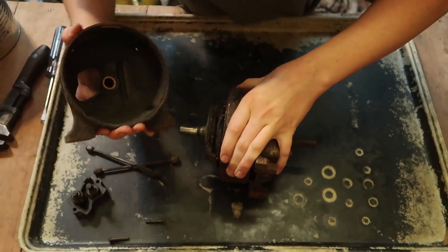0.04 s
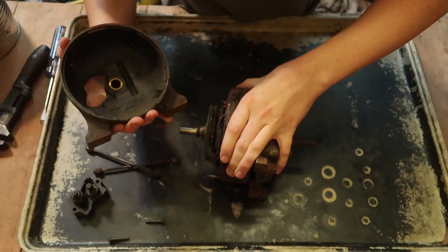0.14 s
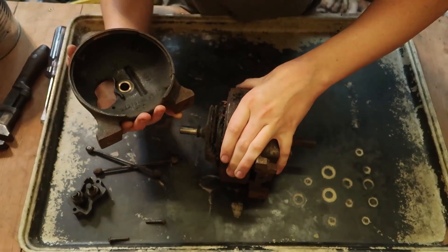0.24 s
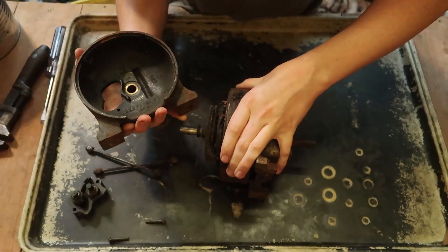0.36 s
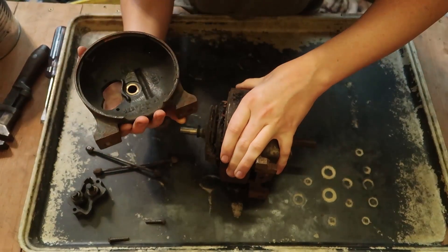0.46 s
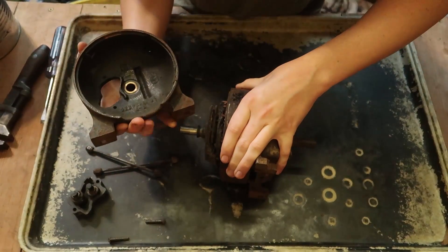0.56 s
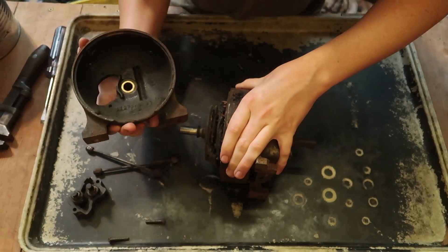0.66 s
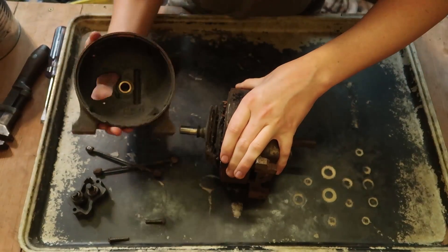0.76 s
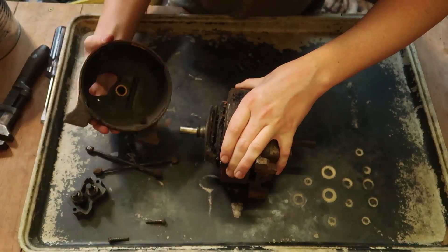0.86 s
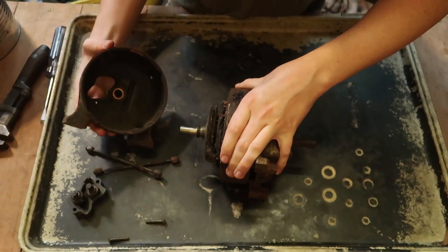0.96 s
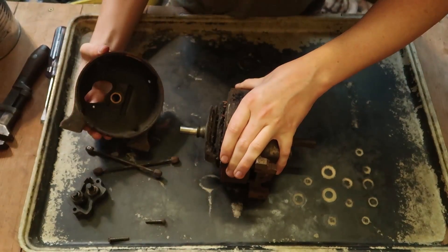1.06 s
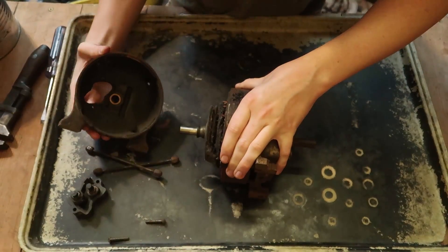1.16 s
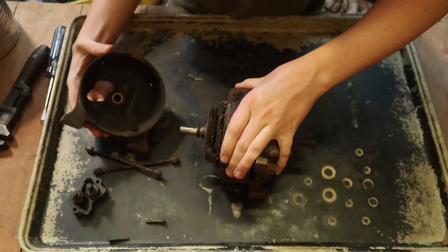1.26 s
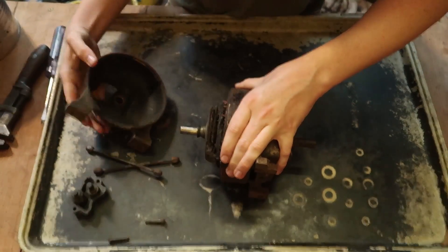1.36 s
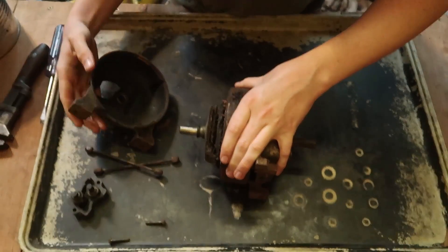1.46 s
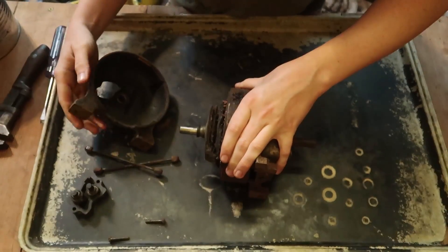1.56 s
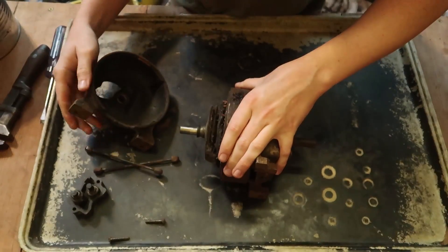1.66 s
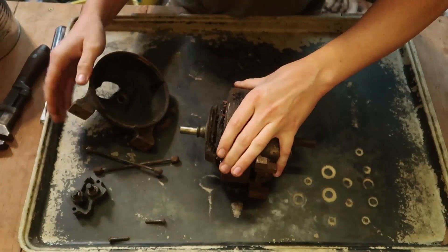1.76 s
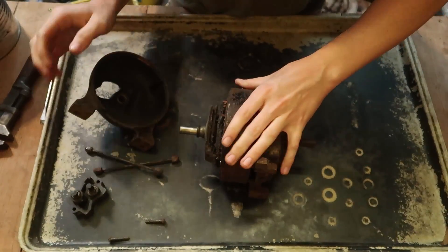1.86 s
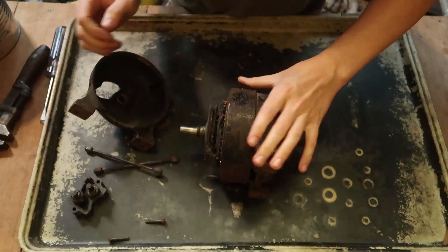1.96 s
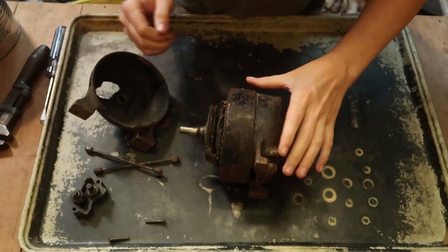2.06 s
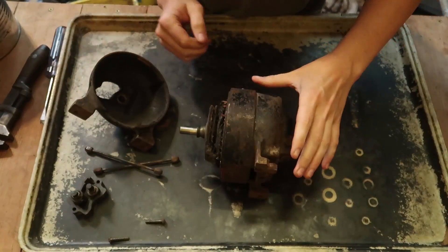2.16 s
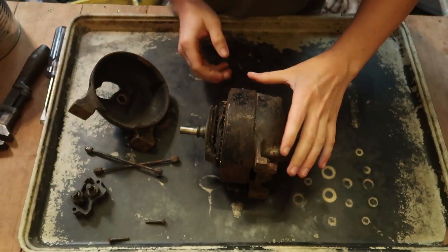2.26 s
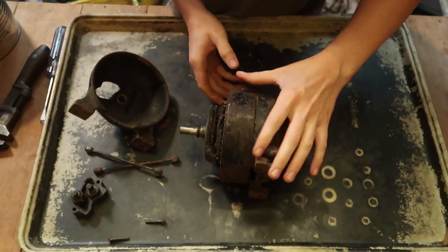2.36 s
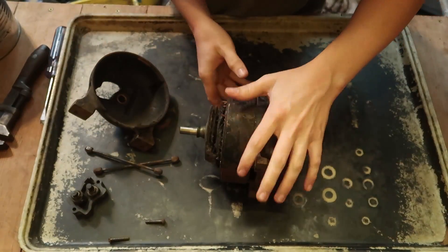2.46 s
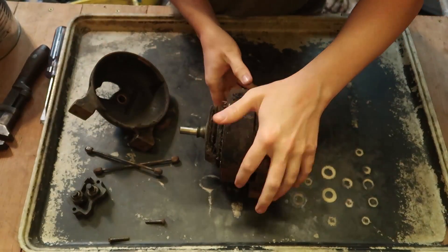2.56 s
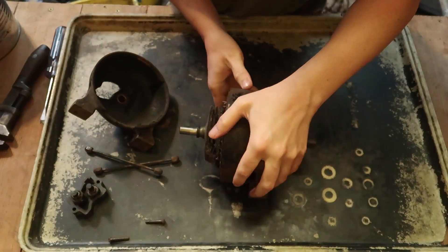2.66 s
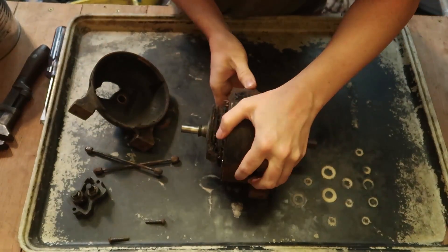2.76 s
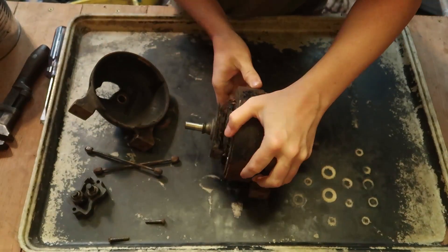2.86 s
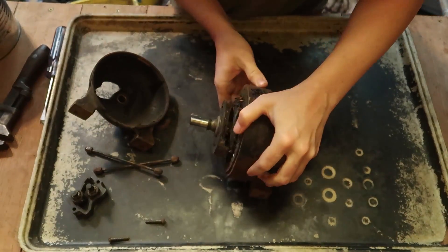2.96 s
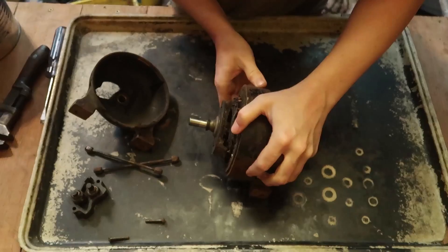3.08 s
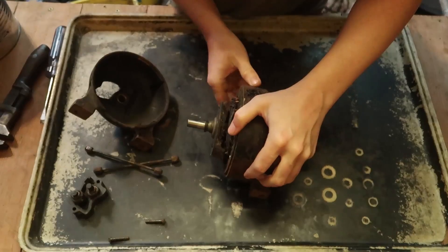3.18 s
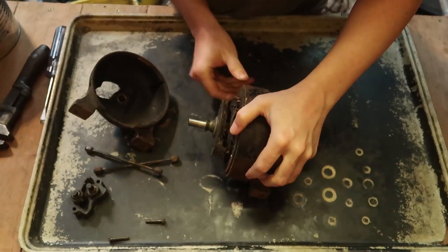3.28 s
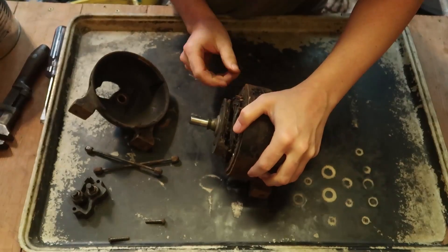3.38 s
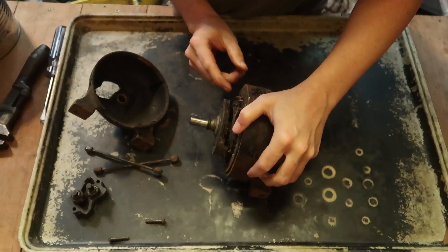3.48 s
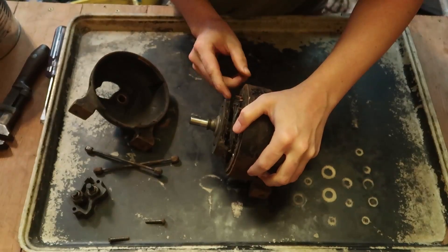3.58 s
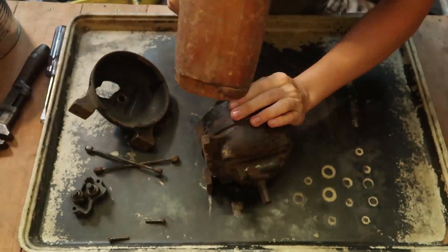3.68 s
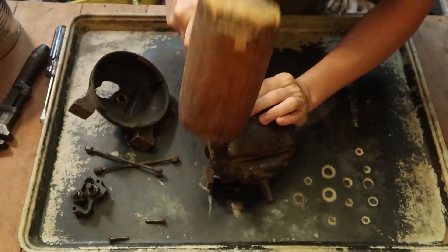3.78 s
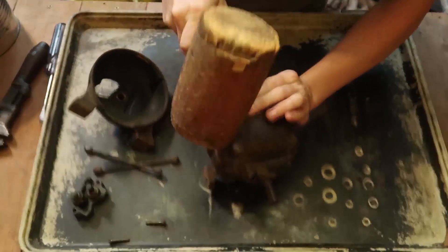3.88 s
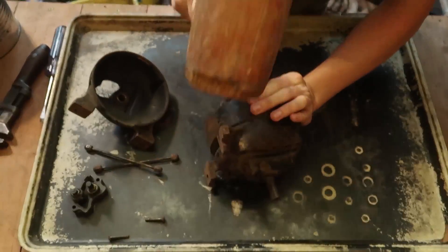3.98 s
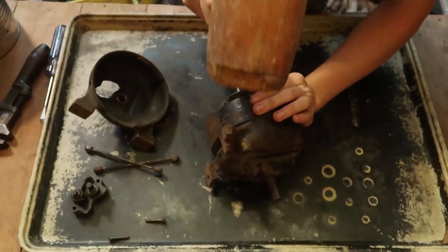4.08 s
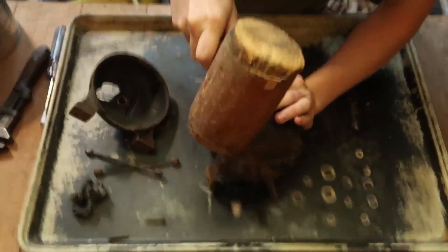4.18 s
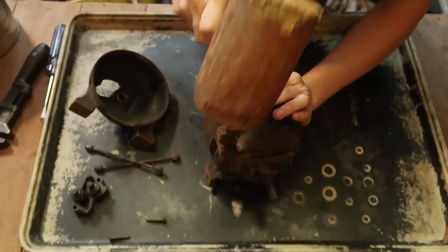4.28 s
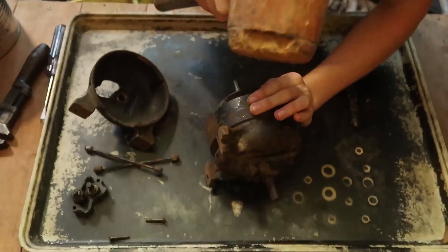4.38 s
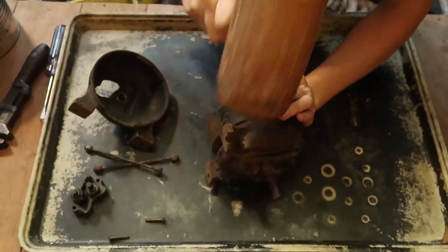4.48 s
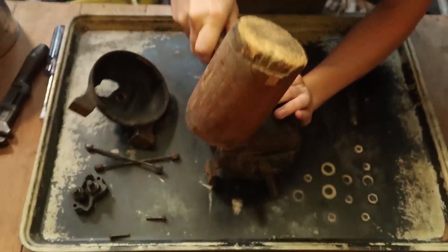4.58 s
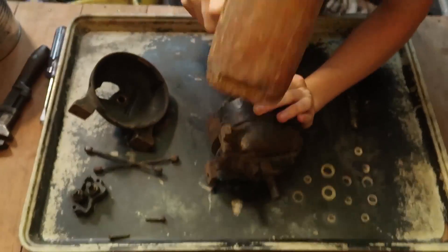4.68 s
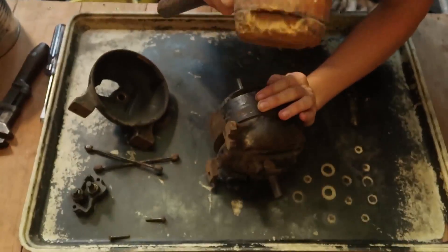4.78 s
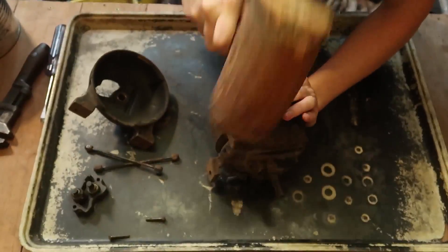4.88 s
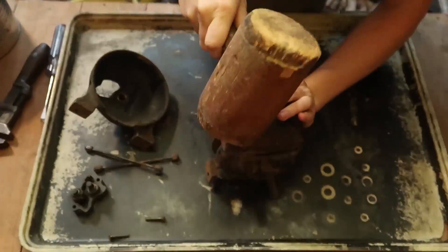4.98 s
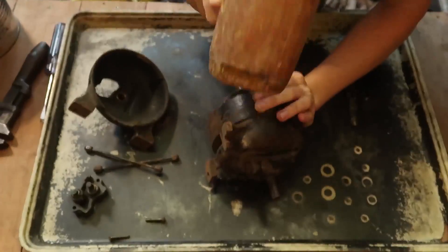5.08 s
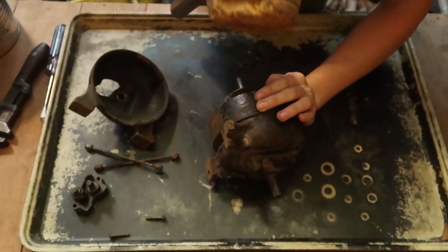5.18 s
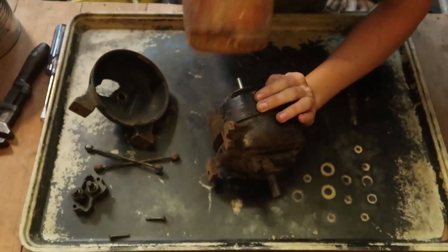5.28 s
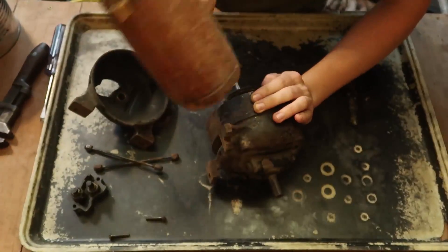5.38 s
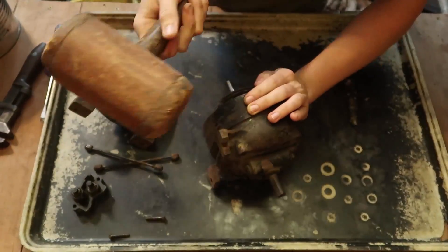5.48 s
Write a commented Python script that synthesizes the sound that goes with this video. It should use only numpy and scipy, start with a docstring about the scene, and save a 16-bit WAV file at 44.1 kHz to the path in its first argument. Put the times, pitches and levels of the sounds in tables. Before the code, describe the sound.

A metal cover clanks onto a steel tray, then a wooden mallet strikes a motor four times, rattling it against the tray.

```python
"""Workshop bench with a steel tray. A cast end cover is set down, slid and dropped. A motor is turned
over, struck four times with a wooden mallet, and rocks on the tray after each blow. Each contact
rings the casting's modes, rattles the tray and thuds the bench; grit rasps under sliding metal.
Around it: hiss, mains buzz, rumble, faint far whistles. The close mic overloads on the hardest knocks."""
import sys
import numpy as np
from scipy import signal
from scipy.fft import rfft, irfft
from scipy.io import wavfile
from scipy.ndimage import uniform_filter1d

SR = 44100
rng = np.random.default_rng(int(sys.argv[2]) if len(sys.argv) > 2 else 0)


def persist_wave(psi):
    """Save psi, clipped to +-1, as 16-bit WAV."""
    counts = np.round(np.clip(psi, -1, 1) * 32767).astype(np.int16)
    wavfile.write(sys.argv[1], SR, np.atleast_2d(counts).T)


N = 244314
RING_S = np.arange(SR // 2) / SR  # time since contact

# Workshop noise spectra: f/Hz, relative density/dB
HISS_SPECTRUM = [(94, -26), (160, -4.5), (260, -13), (340, -5.5), (430, -12.5), (700, -14.5), (1120, -18.5),
                 (2220, -21), (4500, -26.5), (6300, -31.5), (9000, -36.5), (12000, -40), (14500, -58.5),
                 (16000, -67)]
RUMBLE_SPECTRUM = [(10, -34.5), (30, -15.5), (55, 1.5), (85, 4.5), (114, 6.5), (135, -18.5), (170, -18.5),
                   (300, -22), (600, -70.5)]
# Hiss, left to right: f/Hz, correlation/1
HISS_COHERENCE = [(150, 0.75), (250, 1), (400, 0.15), (700, 0.097), (1500, 0.11), (5000, .02)]
# Mains buzz: f/Hz, level/dB re hiss
BUZZ_TONES = [(360, -21), (480, -9), (720, -24), (960, -23.5), (1200, -19), (1253, -27.5), (1560, -30)]
# Background gain, lower after the hard knocks: t/s, level/dB
SHOP_GAIN = [(0, -3.5), (.85, 0.64), (1.48, 1.8), (1.62, -9.5), (2.3, -9.5), (3.3, 0.5), (3.95, 0.3),
             (4.3, -4.5), (4.8, -7.5), (5.54, -10.5)]

# Modes of motor, cover, bench, mallet head: f/Hz, level/dB, t60/s
MOTOR_MODES = [(191, -9.5, 0.09), (315.6, -10, 0.4), (426.5, 5.5, 0.05), (485, -26.5, 0.11),
               (600, -8, 0.005), (672, -11, 0.048), (751, 3, 0.03), (1094, 1.5, 0.027),
               (1350, -20.5, 0.048), (1640, 3, 0.031), (1850, -24, 0.14), (2520, 1, 0.065),
               (3200, -11.5, .03), (5130, -18.5, 0.056)]
COVER_MODES = [(460, -5, .05), (603, -9, 0.18), (822, -11.5, 0.13), (1138, -13.5, 0.15), (1212, -4, 0.075),
               (1303, 5, .05), (1575, -5.5, 0.065), (1860, -2.5, .06), (2000, -7, .05), (2370, -9, 0.045),
               (2830, -5.5, 0.033), (3040, -3.5, .04)]
BENCH_MODES = [(65, -4.5, .2), (76.8, 6.5, 0.13), (95.5, 4, 0.14), (125, -2, 0.1)]
MALLET_MODES = [(2130, -8.5, .04), (2356, 2.4, 0.054), (2550, -7.5, 0.033), (2950, -12, 0.043),
                (3600, -12.5, .03)]
# Tray's free rim: f/Hz, level/dB, t60/s
RIM_DECAY = [(150, -6, 0.98), (500, -7.5, 0.12), (1500, -18, 0.4), (4000, -18.5, .4), (7000, -14, 0.12),
             (10000, -15, .2)]
# Spectra of tray rattle, contact crack, grit: f/Hz, level/dB
TRAY_SPECTRUM = [(90, -25), (150, -2.5), (320, -4), (600, -11.5), (1000, -11.5), (1600, -13), (2600, -13.5),
                 (4000, -24), (6000, -35), (8000, -42), (14000, -59.5)]
CRACK_SPECTRUM = [(400, -13), (900, -3), (1500, 2.5), (2400, 1), (3200, -5.5), (4800, -4.5), (7000, -20),
                  (9000, -22.5), (12000, -36), (17000, -60.5)]
GRIT_SPECTRUM = [(180, -32), (350, -7.5), (650, -9.5), (1150, 0.5), (1600, -6), (2050, -2), (2500, -7),
                 (3050, -4.5), (3500, -12.5), (5500, -25.5), (7000, -34.5), (14000, -63)]
# Room echo: f/Hz, t60/s
ROOM_DECAY = [(200, 0.56), (1000, 0.55), (4000, 0.12), (10000, 0.05)]

# Thud, rattle, crack and head below are gains re the row's level.
# Hand shifts and rolls the motor: t/s, level/dB, contact/ms, thud/dB, crack/dB
MOTOR_SHIFTS = [(0.161, -44.5, 0.07, -2, -2), (3.076, -37, 0.66, 9, -25), (3.087, -37, 0.34, -5, -14),
                (3.094, -24, 1.55, -8, -35), (3.111, -27.5, 1.4, -22, -35), (3.1367, -22, .36, -5, -21),
                (3.18, -31, 0.61, -5, -18), (3.194, -25.5, 2.2, 5, -35), (3.213, -41, 0.29, 9, 2),
                (3.225, -31.5, 1.9, -13, -35), (3.476, -32.5, 1.8, -1, -30), (3.519, -42.5, 1.4, 15, -33)]
# Far whistles: t/s, length/s, f/Hz, flat at onset/Hz, level before fade/dB
FAR_WHISTLES = [(.645, 0.087, 2235, 60, -66), (.81, 0.14, 2244, 30, -60.5), (2.549, 0.12, 2960, 30, -65),
                (3.737, 0.27, 2770, 430, -55.5)]
# Cover meets tray: t/s, level/dB, thud/dB, rattle/dB, crack/dB
COVER_HITS = [(1.1265, -7, -6.5, -2.5, -37), (1.1336, -6.5, 2.5, -7.5, -37.5),
              (1.312, -43.5, -10.5, -1.5, -22.5), (1.4682, -21.5, -10, -15.5, -18.5),
              (1.4707, 4, -8, 0.5, -22.5), (1.4749, 6, -8.5, -17, -14), (1.4828, -6, 2.5, -7, -19.5),
              (1.5681, -19.5, 7, 2, -35)]
# Metal dragged on the tray: t/s, length/s, first level/dB, last level/dB
TRAY_SLIDES = [(1.164, .12, -41, -53), (1.313, 0.056, -54, -52), (1.365, 0.099, -46, -43),
               (1.568, 0.097, -31.5, -68), (3.201, 0.39, -64, -66), (4.137, 0.23, -57.5, -65),
               (4.468, .15, -61, -67), (5.207, 0.19, -61, -72)]
# Mallet on motor: t/s, level/dB, rattle/dB, crack/dB, head/dB
MALLET_BLOWS = [(3.9346, 3.5, -6, -14, -23), (4.2849, 0.5, -1.5, -19, -15), (4.64, -4, 5, -34, -12),
                (5.0178, -3, -4.5, -40, -25)]
# Motor rocks back onto the tray: t/s, level/dB, rattle/dB, crack/dB
MOTOR_ROCKS = [(3.995, -9, -5.5, -8.5), (4.0235, -17.5, -20, -17), (4.0716, -19, 0.5, -14),
               (4.1006, -23, -4, -18), (4.133, -26, -13, -27), (4.3296, -12.5, -29.5, -18),
               (4.35, -21.5, -18.5, -12.5), (4.427, -21.5, -3, -11), (4.4551, -27, -4.5, -12.5),
               (4.687, -17, -1.5, -7.5), (4.708, -21, -6.5, -7.5), (4.73, -23, -1.5, -37.5),
               (4.782, -23.5, -1, -11.5), (4.811, -25.5, -2, -17.5), (4.925, -37.5, -7, -32),
               (5.036, -12, 7, -29.5), (5.066, -15.5, 0, -2.5), (5.089, -21.5, 0, -12),
               (5.159, -26.5, -5, -14), (5.186, -32, -3, -15)]


def gain(db):
    """dB to amplitude."""
    return 10 ** (np.asarray(db) / 20)


def unit_rms(x):
    """Scale to rms 1."""
    return x / np.sqrt(np.mean(x ** 2) + 1e-20)


def unit_peak(x):
    """Scale to peak 1."""
    return x / (abs(x).max() + 1e-20)


def lookup(table, hz):
    """Interpolate over log frequency."""
    table_hz, value = np.transpose(table)
    return np.interp(np.log(hz + 1), np.log(table_hz + 1), value)


def add(mix, start_s, sound):
    """Mix in at start_s."""
    part = mix[:, round(start_s * SR):][:, :sound.shape[1]]
    part += sound[:, :part.shape[1]]


def coloured(x, spectrum):
    """Filter by a table of f/Hz, level/dB."""
    n = x.shape[-1]
    return irfft(rfft(x) * gain(lookup(spectrum, np.fft.rfftfreq(n, 1 / SR))), n)


def diffuse_noise(spectrum, coherence, patch_db):
    """Partly coherent stereo noise; patch_db sets the depth of drifting spectral patches."""
    frames, hz = N // 256 + 5, np.fft.rfftfreq(1024, 1 / SR)
    draw = rng.standard_normal((frames, 513, 5)).T
    patches = unit_rms(uniform_filter1d(uniform_filter1d(draw[4], 10, 0), 14, 1))
    alike = np.clip(lookup(coherence, hz), 0, 1)[:, None]
    left = draw[0] + 1j * draw[1]
    right = alike * left + np.sqrt(1 - alike ** 2) * (draw[2] + 1j * draw[3])
    bands = np.array([left, right]) * gain(lookup(spectrum, hz)[:, None] + patch_db * patches)
    return unit_rms(signal.istft(bands, nperseg=1024, noverlap=768)[1][:, :N])


def workshop(hiss_db=-53, rumble_db=-47, treble_hz=6760):
    """Diffuse hiss and mains buzz over a centred rumble; all follow SHOP_GAIN, the treble most."""
    t = np.arange(N) / SR
    drift_db = np.interp(t, *np.transpose(SHOP_GAIN))
    buzz = sum(gain(db) * np.sin(2 * np.pi * hz * t + rng.uniform(0, 6) + rng.uniform(0, 0.93, (2, 1)))
               for hz, db in BUZZ_TONES)
    hiss = diffuse_noise(HISS_SPECTRUM, HISS_COHERENCE, patch_db=1.3) + np.sqrt(2) * buzz
    treble = signal.sosfiltfilt(signal.butter(2, treble_hz, "high", fs=SR, output="sos"), hiss)
    hiss = hiss - treble + treble * gain(.6 * drift_db)
    rumble = diffuse_noise(RUMBLE_SPECTRUM, coherence=[(60, .999), (120, 1), (250, .3)], patch_db=0)
    return gain(hiss_db + drift_db) * hiss + gain(rumble_db + .7 * drift_db) * rumble


def modes(table):
    """One damped sine per row."""
    hz, db, t60_s = np.transpose(table)[:, :, None]
    return gain(db - 60 * RING_S / np.maximum(t60_s, .005)) * np.sin(2 * np.pi * hz * RING_S)


def tray_rattle(contact_ms, lump_db=2.5, middle_t60_s=0.049):
    """Dense sheet modes and chattering loose parts: lumpy noise decaying band by band."""
    frames, hz = len(RING_S) // 32 + 5, np.fft.rfftfreq(128, 1 / SR)[:, None]
    t = np.arange(frames) * 32 / SR
    draw = rng.standard_normal((frames, 65, 5)).T
    side = np.minimum(.05 + hz / 7000, 1) * (draw[2] + 1j * draw[3])  # wider in the treble
    bands = draw[0] + 1j * draw[1] + np.array([side, -side])
    lumps = unit_rms(uniform_filter1d(uniform_filter1d(draw[4], 8, 0), 5, 1))
    rim_db, rim_t60_s = (lookup(np.array(RIM_DECAY)[:, [0, k]], hz) for k in (1, 2))
    decay = gain(-60 * t / middle_t60_s) + gain(rim_db - 60 * t / rim_t60_s)  # loaded middle, free rim
    bands *= gain(lump_db * lumps) * decay
    bands /= np.hypot(1, hz * contact_ms / 400)  # long contact: less treble
    bands /= np.hypot(1, 25 / (contact_ms * hz + 1))  # short contact: less bass
    sound = coloured(signal.istft(bands, nperseg=128, noverlap=96)[1][:, :len(RING_S)], TRAY_SPECTRUM)
    return sound / np.sqrt(np.mean(sound[:, :900] ** 2)) / 3


def crack(tau_s=.00055):
    """First touch: a brief noise burst."""
    draw = rng.standard_normal((3, 2048))
    u = RING_S[:2048] / tau_s
    return unit_peak(coloured(draw[0] + .7 * draw[1:], CRACK_SPECTRUM) * u ** 2 * np.exp(-u))


def contact(body, level_db, rattle_db, crack_db, thud_db, contact_ms, damping_db_per_s, polarity=1):
    """A force pulse rings body, tray and bench; the jolted mass pushes air. Polarity: 1 up, -1 down."""
    u = RING_S[:1600] * 1000 / contact_ms
    force = u ** 2 * np.exp(-1.6 * u)
    drive = polarity * (1 + .35 * rng.standard_normal(len(body)))  # varies with the spot struck
    ring = (drive * (1 + .07 * rng.standard_normal((2, len(body))))) @ body
    ring = unit_peak(signal.oaconvolve(ring, force[None])[:, :len(RING_S)])
    air_push = polarity * unit_peak(np.gradient(np.exp(-((u - 4.5) / 2) ** 2)) * np.minimum(u, 1) ** 2)
    rattle = tray_rattle(contact_ms) * (1 - np.exp(-RING_S / 0.0027))  # bending waves spread out
    thud = unit_peak(modes(BENCH_MODES).sum(0)) * (1 - np.exp(-RING_S / 0.0038))
    sound = (ring + gain(rattle_db) * rattle) * gain(-damping_db_per_s * RING_S) + gain(thud_db) * thud
    add(sound, 0, gain(crack_db) * crack())
    add(sound, 0, gain(-3) * air_push[None])
    fade = np.minimum(10 * (RING_S[-1] - RING_S), 1)
    return gain(level_db) * sound * fade


def room_echo(x, low_cut_hz=110):
    """Sparse reflections of random sign; treble dies first, the walls return little bass."""
    taps = np.zeros((2, SR // 2))
    grid = np.arange(200, SR // 2 - 20, 20)
    delays = grid + rng.integers(0, 20, (2, len(grid)))
    np.put_along_axis(taps, delays, rng.choice([-1., 1.], delays.shape), 1)
    hz, t, bands = signal.stft(taps, SR, nperseg=256)
    tail = signal.istft(bands * gain(-60 * t / lookup(ROOM_DECAY, hz)[:, None]), SR, nperseg=256)[1]
    tail = signal.sosfilt(signal.butter(2, low_cut_hz, "high", fs=SR, output="sos"), tail)
    return signal.fftconvolve(x, tail / np.linalg.norm(tail[0]), axes=1)[:, :N]


def whistle(length_s, pitch_hz, flat_hz, level_db, swoop_s=.012, waver_hz=34.8, fade_db=-9):
    """A thin tone swoops up to pitch, wavers, flutters and fades."""
    t = np.arange(0, length_s, 1 / SR)
    waver, flutter = (unit_rms(uniform_filter1d(v, 300)) for v in rng.standard_normal((2, len(t))))
    hz = pitch_hz - flat_hz * np.exp(-t / swoop_s) + waver_hz * waver
    tone = np.sin(2 * np.pi * np.cumsum(hz) / SR + rng.uniform(0, 1.6, (2, 1)))
    level = gain(level_db + fade_db * t / length_s + 3.5 * flutter)
    return np.sqrt(2) * level * tone * signal.windows.tukey(len(t), .45)


def slide(length_s, first_db, last_db, snaps_per_s=3000, spread_db=2, snap_s=.0016):
    """Grit snaps densely under moving metal, each snap a puff of noise."""
    t = np.arange(0, length_s, 1 / SR)
    strength = gain(spread_db * np.minimum(rng.exponential(1, len(t)), 3))
    snaps = strength * (rng.random(len(t)) < snaps_per_s / SR)
    puffs = signal.oaconvolve(snaps, np.exp(-RING_S[:600] / snap_s))[:len(t)]
    draw = rng.standard_normal((3, len(t)))
    rasp = unit_rms(coloured(puffs * (draw[0] + .3 * draw[1:]), GRIT_SPECTRUM))
    level = gain(first_db + (last_db - first_db) * (t / length_s) ** 1.5)
    return level * rasp * signal.windows.tukey(len(t), .04)


def mallet_head(rise_s=.001):
    """The wooden head rings briefly in its own modes."""
    drive = rng.uniform(.7, 1.3, (2, len(MALLET_MODES)))
    return drive @ modes(MALLET_MODES) * np.minimum(RING_S / rise_s, 1)


def scene():
    """Bench work and whistles with their echo, over the workshop noise."""
    mix, motor, cover = np.zeros((2, N)), modes(MOTOR_MODES), modes(COVER_MODES)
    for t, db, contact_ms, thud_db, crack_db in MOTOR_SHIFTS:
        add(mix, t, contact(motor, db, rattle_db=-7.5, crack_db=crack_db, thud_db=thud_db,
                            contact_ms=contact_ms, damping_db_per_s=168))
    for t, *settings in FAR_WHISTLES:
        add(mix, t, whistle(*settings))
    for t, db, thud_db, rattle_db, crack_db in COVER_HITS:
        add(mix, t, contact(cover, db, rattle_db, crack_db, thud_db, contact_ms=.1, damping_db_per_s=60))
    for t, *settings in TRAY_SLIDES:
        add(mix, t, slide(*settings))
    for t, db, rattle_db, crack_db, head_db in MALLET_BLOWS:
        add(mix, t, gain(db + head_db) * mallet_head())
        add(mix, t, contact(motor, db, rattle_db, crack_db, thud_db=-4.5,
                            contact_ms=.27, damping_db_per_s=43, polarity=-1))
    for t, db, rattle_db, crack_db in MOTOR_ROCKS:
        add(mix, t, contact(motor, db, rattle_db, crack_db, thud_db=-3,
                            contact_ms=.33, damping_db_per_s=168))
    low_cut = signal.butter(4, 55, "high", fs=SR, output="sos")  # small parts radiate no deep bass
    mix = signal.sosfilt(low_cut, mix)
    return mix + gain(-30) * room_echo(mix) + workshop()


def record(dry, cutoff_hz=16300):
    """Mic overload at full scale, short knee, then a low-pass."""
    clipped = dry / (1 + dry ** 8) ** (1 / 8)
    low_pass = signal.firwin(511, cutoff_hz, window=("kaiser", 9), fs=SR)
    return signal.oaconvolve(clipped, low_pass[None], "same")


dry = scene()
out = record(dry)
persist_wave(out)
```